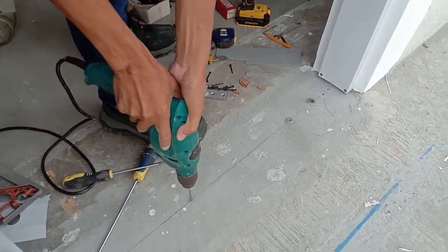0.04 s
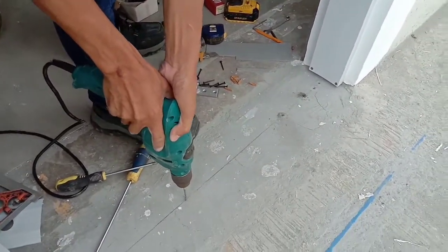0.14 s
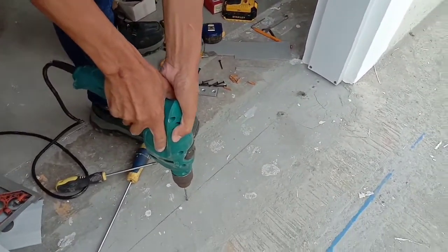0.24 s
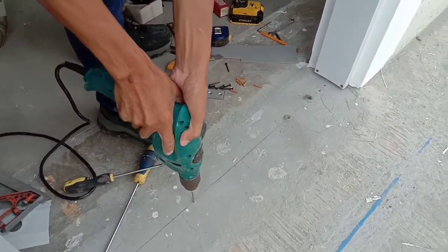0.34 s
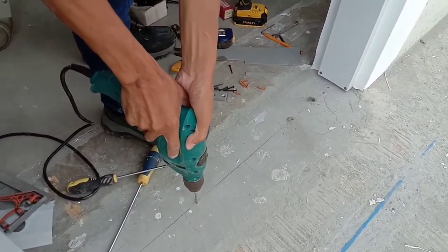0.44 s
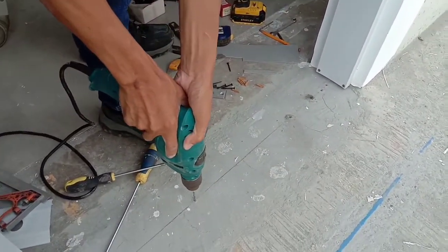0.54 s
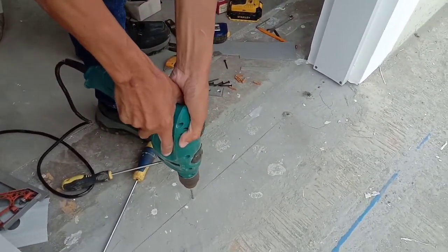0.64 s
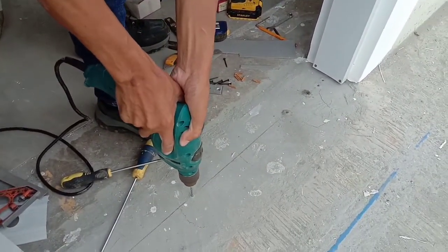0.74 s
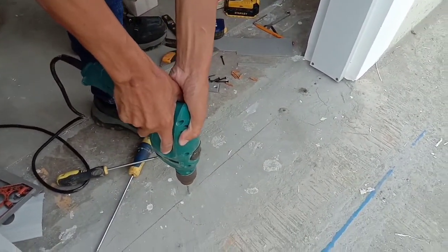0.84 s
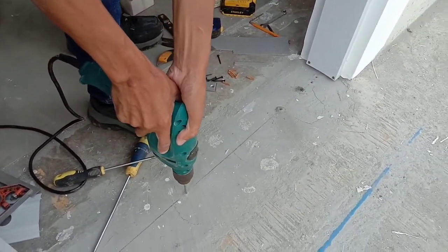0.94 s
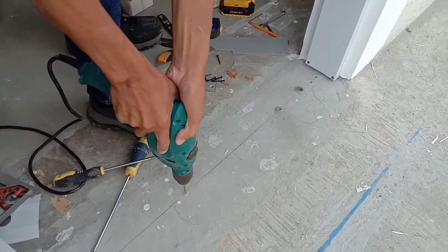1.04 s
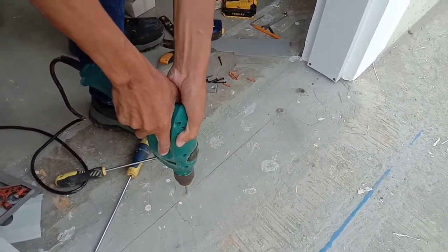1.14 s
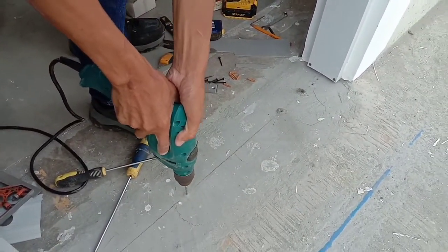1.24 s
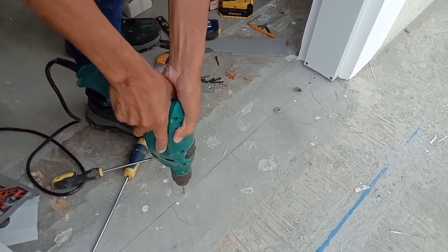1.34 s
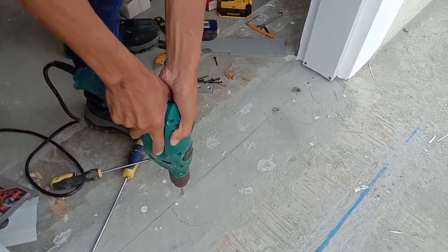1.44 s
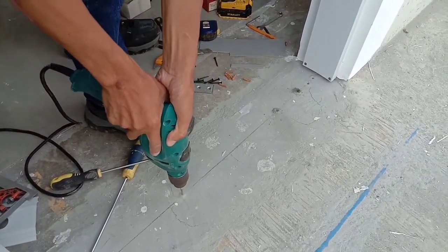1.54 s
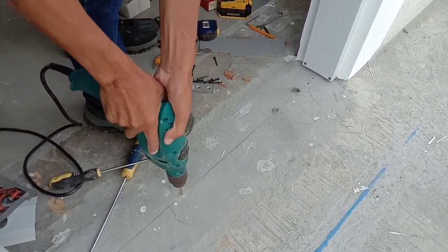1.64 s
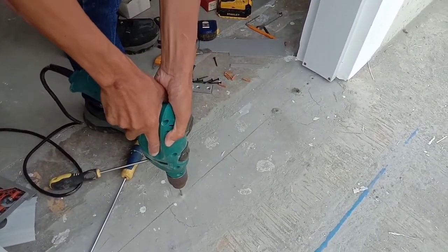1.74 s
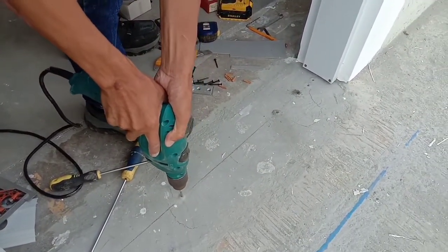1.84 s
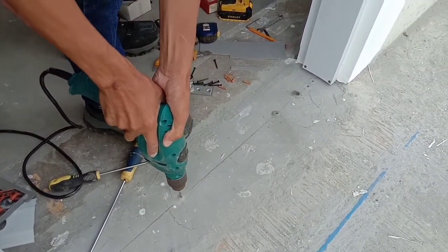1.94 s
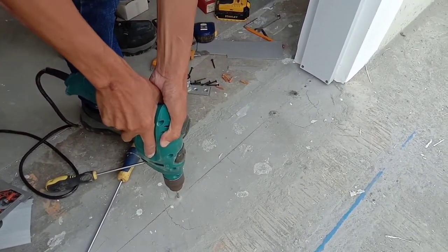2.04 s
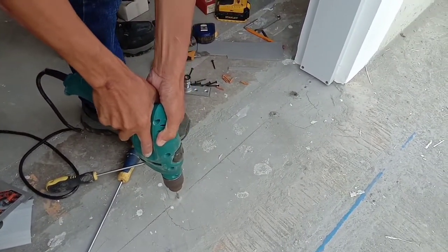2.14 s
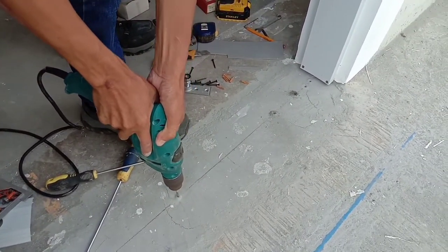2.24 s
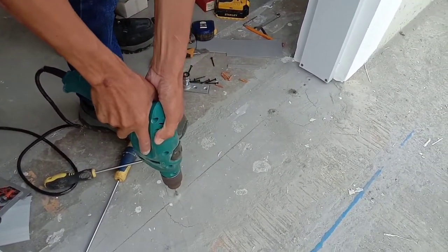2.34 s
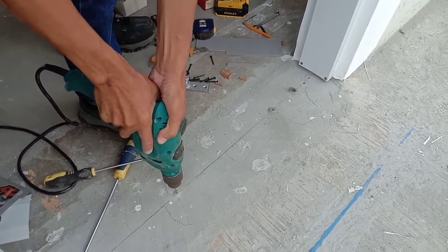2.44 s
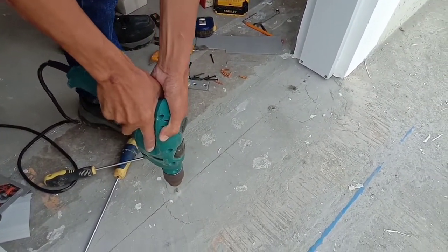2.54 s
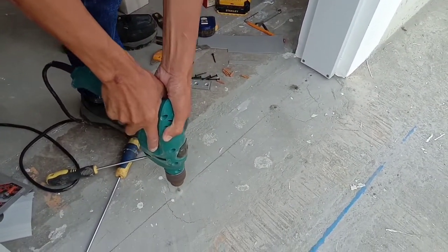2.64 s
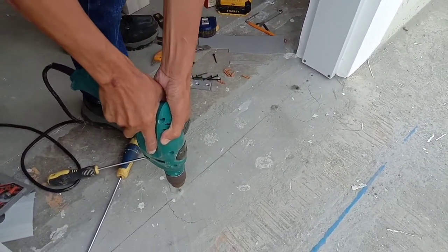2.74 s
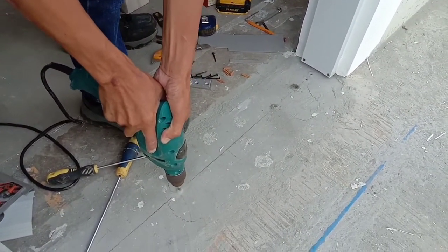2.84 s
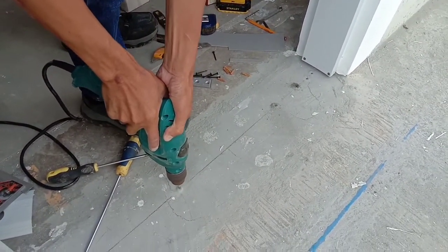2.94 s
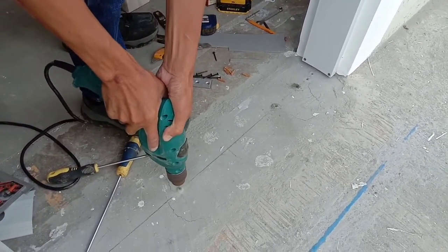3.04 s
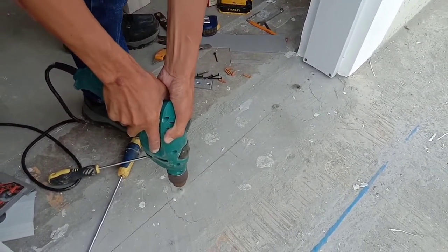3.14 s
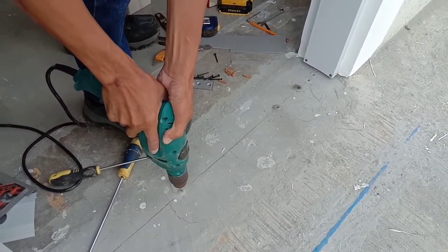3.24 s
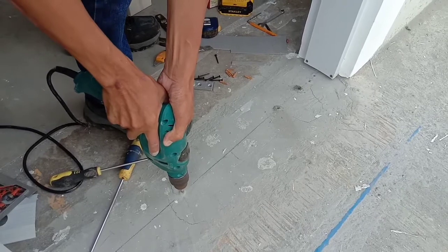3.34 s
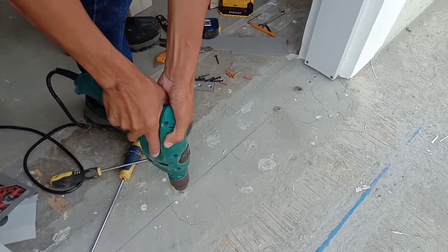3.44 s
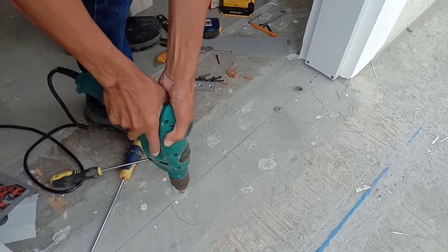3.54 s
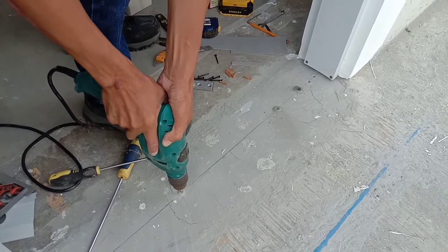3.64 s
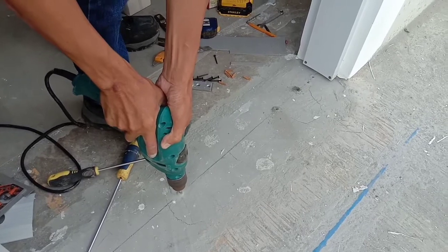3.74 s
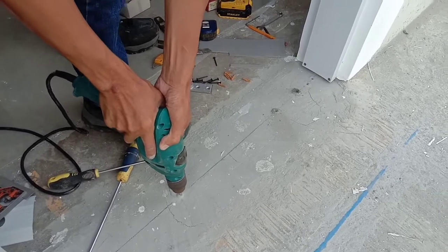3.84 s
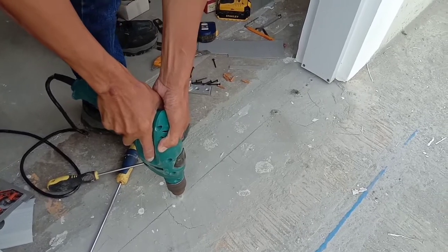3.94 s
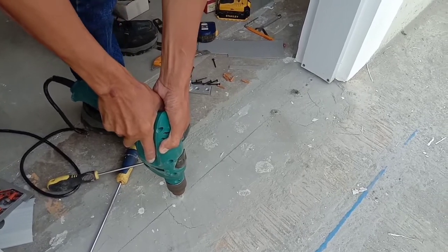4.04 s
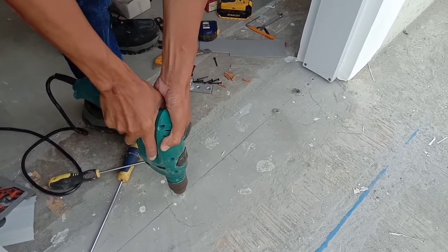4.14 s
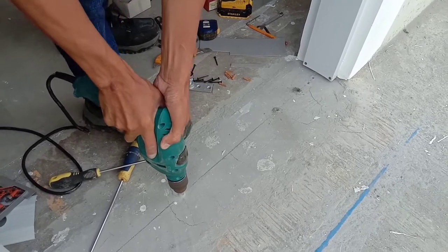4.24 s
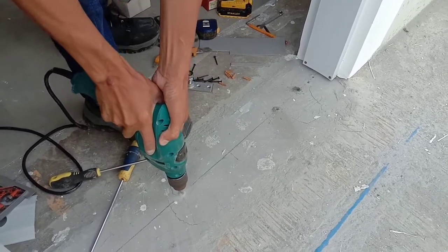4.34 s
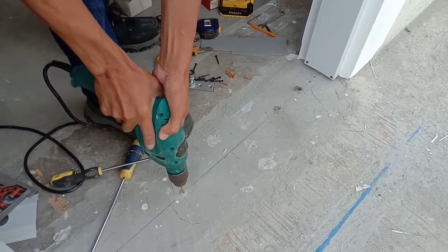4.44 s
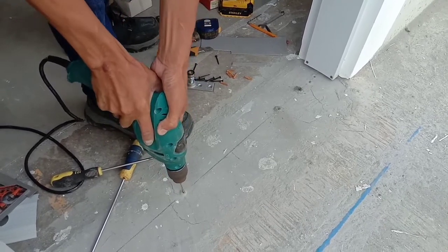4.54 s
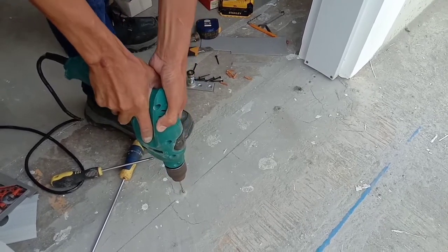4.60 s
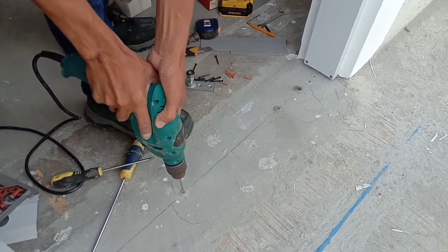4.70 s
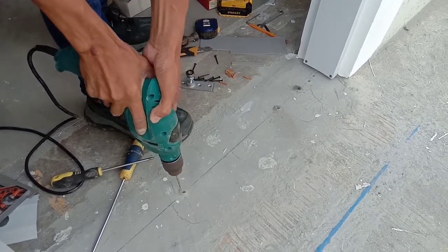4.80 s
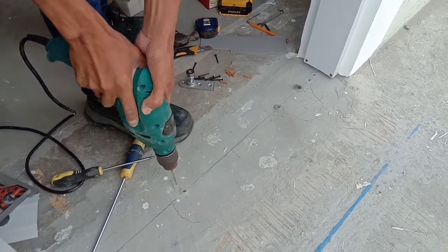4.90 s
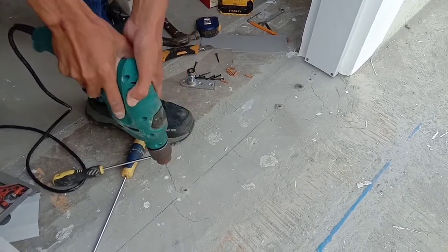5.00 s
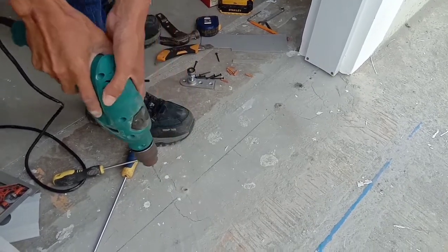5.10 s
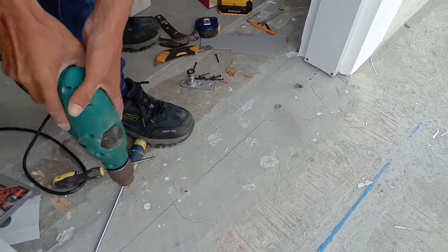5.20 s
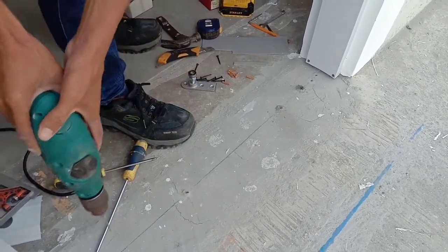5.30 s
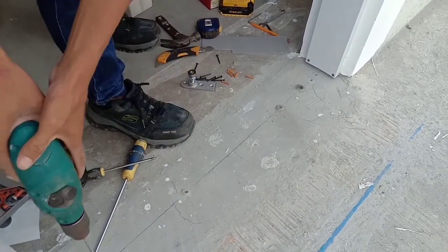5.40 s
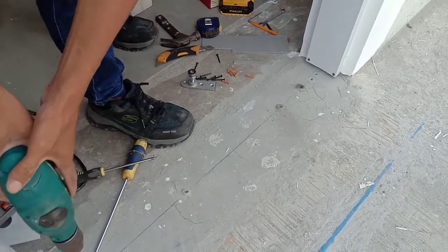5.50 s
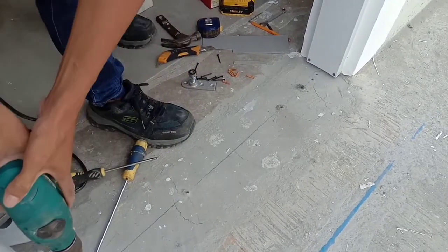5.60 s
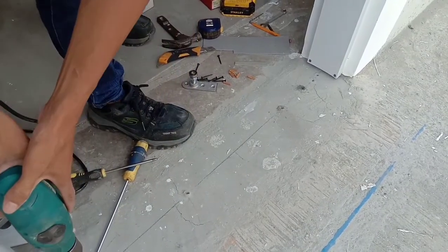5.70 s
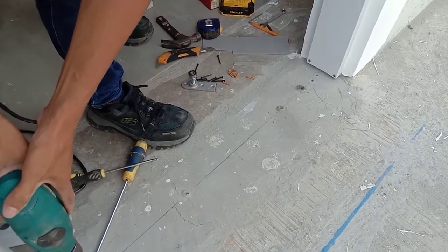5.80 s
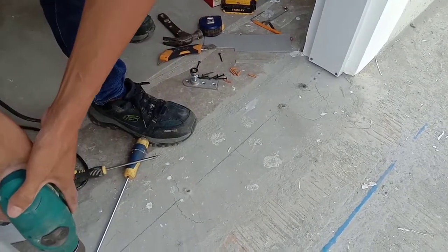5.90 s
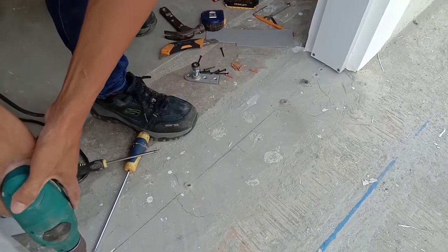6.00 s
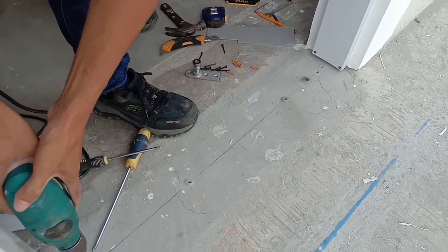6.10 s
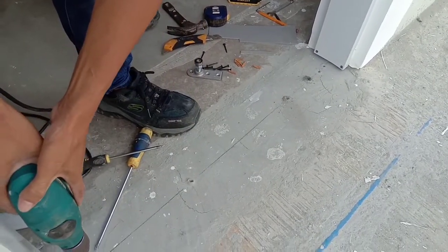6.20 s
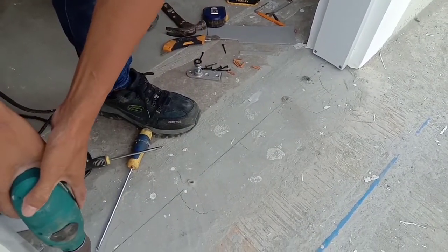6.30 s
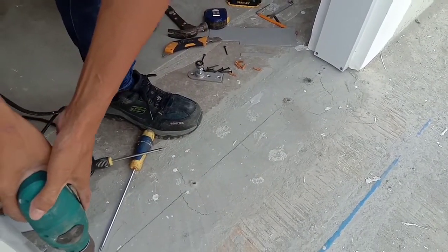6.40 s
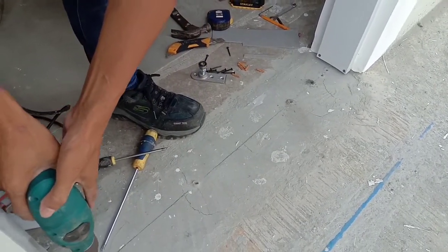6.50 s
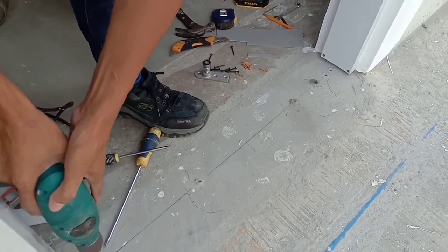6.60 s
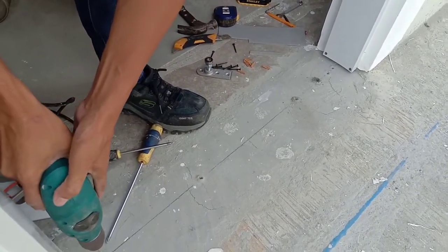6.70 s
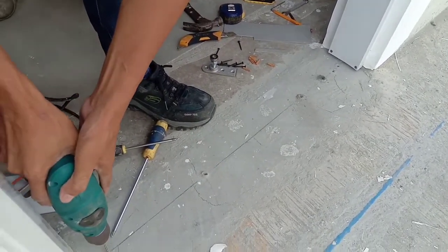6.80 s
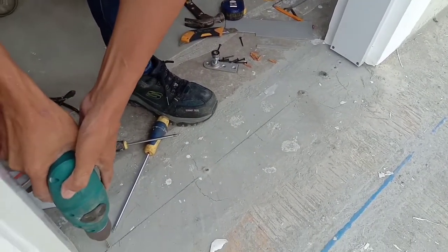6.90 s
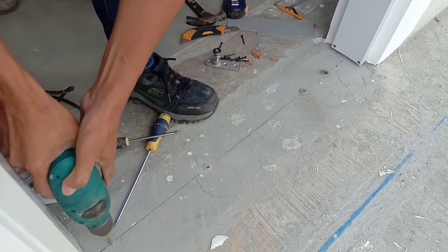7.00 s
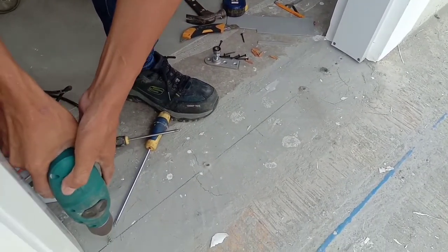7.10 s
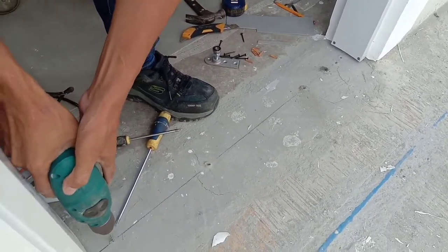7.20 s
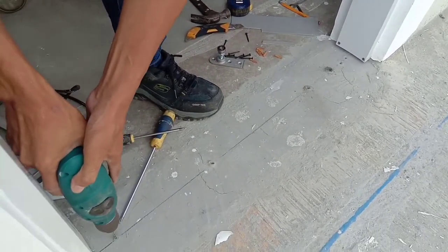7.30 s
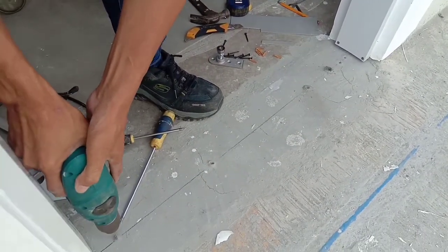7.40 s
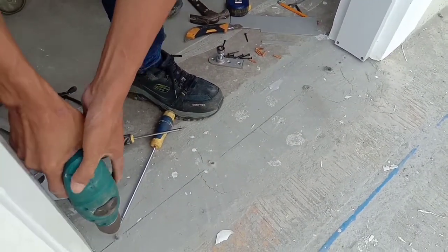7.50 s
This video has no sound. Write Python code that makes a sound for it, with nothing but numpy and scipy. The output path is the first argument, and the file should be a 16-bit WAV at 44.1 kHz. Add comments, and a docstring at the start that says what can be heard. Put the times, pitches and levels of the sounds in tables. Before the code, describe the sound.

A corded hammer drill revs up and grinds harshly into concrete, pulls out with clinks, whines down, then starts a second hole.

```python
"""A bare room: a corded hammer drill bores a concrete floor, close to the microphone.
Each ratchet tooth rings the bit and crushes grit; the blows also hum through drill and slab until the bit is out.
The motor then runs free and coasts down: fan rush, brush hiss and a falling commutator whine, with cooling air
buffeting the microphone; then a second hole is begun."""
import sys
import numpy as np
from scipy import signal
from scipy.fft import rfft, irfft, next_fast_len
from scipy.io import wavfile
from scipy.ndimage import uniform_filter1d

SR = 44100
rng = np.random.default_rng(int(sys.argv[2]) if len(sys.argv) > 2 else 0)


def unload_wav(signal):
    """Save mono or channel-first audio to the path in sys.argv[1] as 16-bit WAV at rate SR, clipped to [-1, 1]."""
    wavfile.write(
        sys.argv[1],
        SR,
        np.round(np.clip(np.atleast_2d(signal).T, -1, 1) * 32767).astype(np.int16),
    )


N = 332955
T = np.arange(N) / SR

TEETH, ROTOR_PER_TOOTH = 16, 10 / 16  # ratchet teeth per spindle turn; rotor turns per tooth
FULL_HZ = 620  # full speed; speeds are ratchet teeth per second
PULL_OUT_S, RELEASE_S, RESTART_S = 4.25, 5.0, 6.523  # bit out of hole 1, trigger released, hole 2 begun


def amp(db):
    """Decibels to gain."""
    return 10 ** (np.asarray(db) / 20)


def evened(x):
    """Scales to rms 1."""
    return x / np.sqrt(np.mean(x ** 2) + 1e-20)


def steady(x):
    """Holds the rms at 1 over about 0.09 s."""
    return x / np.sqrt(uniform_filter1d(x ** 2, size=4000) + 1e-12)


def curve(rows, axis=1):
    """One table column interpolated at every sample."""
    rows = np.array(rows)
    return np.interp(T, rows[:, 0], rows[:, axis])


def level(rows, axis=1):
    """A dB column as gain, silent outside its table."""
    inside = 1. * (T >= rows[0][0]) * (T <= rows[-1][0])
    return amp(curve(rows, axis)) * uniform_filter1d(inside, size=90)


def gate(start, end, edge_s):
    """1 between two times, with straight ramps centred on them."""
    return np.clip(.5 + np.minimum(T - start, end - T) / edge_s, 0, 1)


def read(points, hz):
    """A spectrum interpolated on a log-frequency axis."""
    f, value = np.transpose(points)
    return np.interp(np.log(hz + 1), np.log(f + 1), value)


def resonance_db(hz, rings):
    """Summed lift of resonances, rows of (f/Hz, width/Hz, lift/dB)."""
    return sum(lift / (1 + (2 * (hz - f) / width) ** 2) for f, width, lift in rings)


def colour(x, points, rings=()):
    """Minimum-phase filter of unit noise gain: broad spectrum plus resonances, falling below its first point."""
    hz = np.fft.rfftfreq(8192, 1 / SR)
    db = read(points, hz) + resonance_db(hz, rings)
    db = db - 10 * np.log10(1 + (points[0][0] / (hz + 5) / 2) ** 4)
    log_gain = np.log(amp(np.r_[db, db[-2:0:-1]]))
    min_phase = np.exp(np.conj(signal.hilbert(log_gain)))
    taps = np.fft.ifft(min_phase).real[:len(hz)]
    return signal.oaconvolve(x, taps / np.linalg.norm(taps))[:N]


def wander(hz):
    """Slow noise of rms 1, low-passed near hz."""
    coarse = np.arange(N // 16 + 2) * 16 / SR
    size = next_fast_len(len(coarse))
    lowpass = 1 / (1 + (np.fft.rfftfreq(size, coarse[1]) / hz) ** 4)
    slow = irfft(rfft(rng.standard_normal(size)) * lowpass, size)
    return evened(np.interp(T, coarse, slow[:len(coarse)]))


def tone(phase, rough):
    """A partial of rms 1 whose height and phase waver."""
    waver = 1 + rough * (wander(46) + 1j * wander(67))
    return evened((waver * np.exp(1j * phase)).real)


# reverberation: f/Hz, t60/s
ROOM_T60 = [(200, 0.39), (2000, 0.52), (6000, 0.37), (14000, 0.32)]


def room(x, wet_db):
    """Adds a tail of sparse reflections, each band dying at its own rate; scaled to keep the power."""
    taps = rng.choice([-1., 1.], SR // 2) * (rng.random(SR // 2) < 2000 / SR)  # 2000 reflections/s
    hz, t, z = signal.stft(taps, SR, nperseg=256)
    decay = amp(-60 * t / read(ROOM_T60, hz)[:, None])
    tail = signal.istft(z * decay, SR, nperseg=256)[1]
    wet = signal.fftconvolve(x, tail / np.linalg.norm(tail))[:N]
    return (x + amp(wet_db) * wet) / np.hypot(1, amp(wet_db))


# trigger squeezes, one a hole: steepest rise t/s, time constant/s
SQUEEZES = [(.075, .26), (6.945, .115)]
# speed the load allows in the first run: t/s, teeth f/Hz
LOADED_SPEED = [(.5, 695), (.85, 712), (1.15, 687), (1.65, 638.8), (1.85, 617.6), (2.4, 592.5),
                (2.63, 593.4), (2.76, 577.7), (2.98, 611.4), (3.4, 615.8), (3.89, 605.6), (4.09, 615),
                (4.3, 648.5), (4.87, 614.3)]
CREEP_HZ, RELEASE_HZ, SECOND_TOP_HZ = 108.87, 597, 652.4
FRICTION_HZ_PER_S, DRAG_EQUAL_HZ = 219, 586  # braking by friction; speed at which air drag equals it


def speed():
    """Teeth per second: S-curve up to what the load allows, coast down against friction and air drag."""
    first, second = (np.exp(-np.exp(np.minimum((s - T) / lag, 5))) for s, lag in SQUEEZES)
    first_top_hz = curve(LOADED_SPEED + [(RELEASE_S, RELEASE_HZ)])
    rise_hz = np.where(T < RESTART_S, first * (first_top_hz - CREEP_HZ), second * (SECOND_TOP_HZ - CREEP_HZ))
    coast_s = np.maximum(T - RELEASE_S, 0)
    angle = np.arctan(RELEASE_HZ / DRAG_EQUAL_HZ) - coast_s * FRICTION_HZ_PER_S / DRAG_EQUAL_HZ
    coasting = np.maximum(DRAG_EQUAL_HZ * np.tan(angle), 20)
    return np.where((T > RELEASE_S) & (T < RESTART_S), coasting, CREEP_HZ + rise_hz)


def with_speed(db_per_octave):
    """Gain of a sound that grows with speed; 1 at full speed."""
    return amp(db_per_octave * np.log2(speed() / FULL_HZ))


# gusts of cooling air: start t/s, length/s, level/dB
GUSTS = [(0, 0.44, -50.5), (.9, 1.26, -60), (2.045, .05, -49), (3.036, 0.25, -63), (3.63, .47, -64),
         (3.82, 0.057, -50.5), (4.37, .87, -61), (4.39, 0.044, -56), (4.54, 0.072, -44), (5.3, 1.01, -43),
         (5.512, .07, -42), (5.67, .07, -36.5), (5.937, .07, -41), (6.169, 0.075, -45), (6.3, 0.19, -50),
         (6.593, .37, -53), (6.922, .04, -53)]
# spectrum of the buffeting: f/Hz, level/dB per Hz
BUFFET_SPECTRUM = [(40, -23.5), (60, -11), (80, 0.5), (100, 0.5), (155, -2.5), (290, -14), (400, -20.5),
                   (550, -38), (900, -85)]
GUST_EDGE_S, DRAUGHT_DB = 0.037, -84


def buffet(lump_db=6.0, smooth_s=0.24):
    """Exhaust eddies thump the microphone over a faint draught; gusts shorter than smooth_s are less lumpy."""
    eddies = wander(23)
    power = amp(DRAUGHT_DB + lump_db * eddies) ** 2
    for s, length, db in GUSTS:
        lumps = evened(amp(lump_db * min(length / smooth_s, 1) * np.minimum(eddies, 1)))
        power = power + (amp(db) * lumps * gate(s, s + length, GUST_EDGE_S)) ** 2
    return np.sqrt(power) * colour(rng.standard_normal(N), BUFFET_SPECTRUM)


# rings of the bit on the wall of the hole: t/s, f/Hz, peak level/dB
CLINKS = [(4.268, 11400, -37), (4.292, 11400, -34), (4.316, 3900, -25.5), (4.319, 11100, -35),
          (4.341, 4000, -32), (4.385, 5700, -29), (4.412, 5170, -22.5), (4.425, 11100, -37),
          (4.548, 11550, -37), (4.555, 4010, -28)]


def clinks(decay_s=0.004):
    """The bit clinks on the wall on its way out: decaying sines of ringing steel."""
    out = np.zeros(N)
    for s, hz, db in CLINKS:
        age = np.maximum(T - s, 0)
        out += amp(db) * np.exp(-np.minimum(age / decay_s, 50)) * np.sin(2 * np.pi * hz * age)
    return out


# rattle of the chuck jaws: f/Hz, level/dB per Hz
CHUCK_SPECTRUM = [(1500, -8.5), (2300, -11), (3100, -4.5), (4000, -12), (5500, -4.5), (7500, -21),
                  (12000, -44)]


def chuck(teeth, db=-45, slack_hz=285, span_hz=70, ring_s=0.016, knocks_per_turn=1.37):
    """In a narrow range of low speed the loose chuck rattles: noise bursts, over one per spindle turn."""
    cycles = knocks_per_turn * teeth / TEETH
    age_s = (cycles % 1) / (np.gradient(cycles) * SR)
    loose = np.exp(-((speed() - slack_hz) / span_hz) ** 2)
    rattle = steady(np.exp(-age_s / ring_s) * rng.standard_normal(N))
    return amp(db) * loose * colour(rattle, CHUCK_SPECTRUM)


# commutator partials: multiple of rotor speed, level/dB
WHINE_PARTIALS = [(12, -15), (22, -10), (24, 0), (30, -14), (36, -19), (48, -13), (72, -13)]
# how the housing passes the whine: f/Hz, level/dB
HOUSING = [(2100, -9), (3000, -6.5), (4400, -14), (4950, -1.5), (5600, -6), (6650, -2.5), (7400, -7),
           (7800, -29), (9400, -27), (13000, -38)]
# narrow overtone swelling as it falls with the whine: t/s, f/Hz, level/dB
FALLING_OVERTONE = [(5.9, 5900, -64), (6.05, 5912, -65), (6.22, 5795, -49), (6.36, 5420, -50),
                    (6.42, 5350, -66)]
WHINE_DB, WHINE_DB_PER_OCTAVE = -35, 4


def whine(teeth, rough=0.35, throb=0.26):
    """Commutator bars pass the brushes and sweep the housing's resonances; a falling overtone swells briefly."""
    rotor = 2 * np.pi * ROTOR_PER_TOOTH * teeth
    rotor_hz = ROTOR_PER_TOOTH * speed()
    bars = sum(amp(db + read(HOUSING, k * rotor_hz)) * tone(k * rotor, rough) for k, db in WHINE_PARTIALS)
    bars *= amp(WHINE_DB) * with_speed(WHINE_DB_PER_OCTAVE) * (1 + throb * np.cos(rotor))
    overtone_phase = 2 * np.pi * np.cumsum(curve(FALLING_OVERTONE)) / SR
    overtone = evened(((wander(160) + 1j * wander(160.5)) * np.exp(1j * overtone_phase)).real)
    return gate(PULL_OUT_S, RESTART_S, edge_s=0.044) * bars + level(FALLING_OVERTONE, axis=2) * overtone


# fan rush at full speed, before the vents: f/Hz, level/dB per Hz
FAN = [(250, -30.5), (400, -15.5), (520, -14), (750, -5.5), (1000, -5.5), (1300, -4), (1800, -6.5),
       (2500, -8), (4000, -11.5)]
# air resonances of the housing: f/Hz, width/Hz, lift/dB
VENTS = [(558, 78, 12), (780, 130, 2), (1026, 150, 8), (1250, 110, 7)]
# fan blades, gears, brushes: multiple of rotor speed, level/dB before the fan gain
ROTOR_TONES = [(2, -20), (4, -19), (5, -18.5), (6, -25), (7, -17), (8, -17.5), (9, -19.5), (11, -22),
               (14, -16.5), (17, -17), (19, -20), (23, -28), (25, -28), (28, -36)]
# brush hiss: f/Hz, level/dB per Hz
BRUSHES = [(1500, -24), (2500, -8.5), (4000, -6.5), (4900, -4.5), (5800, 4), (6500, -2.5), (7300, -7),
           (8200, -17), (11000, -16.5), (13000, -27.5), (15400, -25)]
FAN_DB, FAN_KNEE_HZ, FAN_STEEPNESS = -36, 411, 4.5  # the fan dies away below the knee speed
BRUSH_DB, BRUSH_DB_PER_OCTAVE = -35.5, 7.5


def motor(teeth, quiet_db=-10, shift=0.67, chatter=0.065, rise_s=0.027):
    """Fan rush and rotor tones sink as the rotor slows; brushes hiss. Quieter outside PULL_OUT_S to RESTART_S."""
    rate = speed()
    risen = np.clip((T - PULL_OUT_S) / rise_s, 0, 1) * (T < RESTART_S)
    frame_s, bin_hz = np.arange(N // 128 + 5) * 128 / SR, np.fft.rfftfreq(512, 1 / SR)
    pace = np.interp(frame_s, T, rate)[:, None] / FULL_HZ
    z = rng.standard_normal((len(frame_s), len(bin_hz), 2)) @ [1, 1j]
    z *= amp(read(FAN, bin_hz / pace ** shift) + resonance_db(bin_hz, VENTS)) / (1 + (bin_hz / 3500) ** 4)
    rush = steady(signal.istft(z.T, nperseg=512, noverlap=384)[1][:N])
    rotor = 2 * np.pi * ROTOR_PER_TOOTH * teeth
    tones = sum(amp(db) * tone(k * rotor, rough=1.0) for k, db in ROTOR_TONES)
    fan_gain = amp(FAN_DB) / np.sqrt(1 + (FAN_KNEE_HZ / rate) ** FAN_STEEPNESS)
    fan = fan_gain * (amp(-2.5) * rush + tones)

    chattering = 1 + chatter * np.cos(2 * np.pi * teeth / TEETH)
    scrape = rng.standard_normal(N) * chattering * amp(0.9 * wander(120))
    hiss = colour(evened(scrape), BRUSHES)
    # slow brushes lose their top octave
    brisk = np.clip(rate / FULL_HZ, 0, 1) ** 0.46
    dull = signal.filtfilt(*signal.butter(2, 7500, fs=SR), hiss)
    hiss = brisk * hiss + (1 - brisk) * dull
    brush_gain = amp(BRUSH_DB) * with_speed(BRUSH_DB_PER_OCTAVE)
    return amp(quiet_db * (1 - risen)) * (fan + brush_gain * hiss)


# flutes rubbing the wall of hole 1: t/s, level/dB
RUBBING = [(1, -54), (1.6, -38.5), (2.2, -34.5), (2.45, -34.5), (2.9, -37.5), (3.4, -32), (3.7, -36.5),
           (4.1, -37.5), (4.2, -35.5)]
# modes of the bit: f/Hz (the upper ones at full speed), width/Hz, level/dB before evening
BIT_MODES = [(1993, 126, -4.5), (5664, 240, 1), (9640, 350, -15.5)]


def singing(teeth, throb=0.64, drift=.7):
    """The bit's modes ring as its bent tip swings against the wall; the upper ones sag with the speed."""
    sagged_s = np.cumsum((speed() / FULL_HZ) ** drift) / SR
    spindle = 2 * np.pi * teeth / TEETH
    swing = 1 + throb * np.cos(spindle) + 0.36 * np.cos(3 * spindle)
    rings = np.zeros(N)
    for k, (hz, width, db) in enumerate(BIT_MODES):
        waver = wander(width / 2) + 1j * wander(width / 2)
        carrier = np.exp(2j * np.pi * hz * (sagged_s if k else T))
        rings += amp(db) * evened((waver * carrier).real)
    return level(RUBBING) * evened(swing * rings)


# hum at the blow rate, one table a hole, before the partials' levels: t/s, level/dB
HUM_LEVEL = [
    [(0, -63), (.3, -60), (.5, -53), (1, -41.5), (1.75, -37.5), (2.1, -39), (3.4, -37), (4.14, -38.5),
     (4.27, -64)],
    [(6.8, -65), (7.02, -58.5), (7.28, -52.5), (7.42, -43), (7.55, -45)],
]
# partials: hole 1 level/dB, hole 2 level/dB, throb/0-1, roughness/0-1
HUM_PARTIALS = [(0, 1.5, 0.06, 0.07), (-12.5, 4, 0.39, 0.19), (-2, 0.5, 0.36, 0.14)]
# bit resonance lifting a partial that passes it in hole 1: f/Hz, width/Hz, lift/dB
HUM_RING = (1800, 115, 4.9)
# brief swells of the overtones: t/s, half length/s, lift/dB
SWELLS = [(.78, 0.052, 6), (1.213, 0.036, 10.5), (1.645, 0.096, 6.5), (4.037, 0.049, 5), (7.2, 0.15, 6)]


def hum(teeth, fade_db=1.56):
    """The blows shake drill and slab at their rate; the bit's wobble throbs the partials with the spindle."""
    out, rate = np.zeros(N), speed()
    swell_db = sum(db * np.exp(-((T - s) / half) ** 2) for s, half, db in SWELLS)
    for k, (first_db, second_db, wobble, rough) in enumerate(HUM_PARTIALS, 1):
        throb = sum(np.cos(2 * np.pi * (m * teeth / TEETH + rng.random())) / np.sqrt(m) for m in range(1, 5))
        swing = 1 + wobble * throb + rough * (wander(63) + 1j * wander(60))
        partial = evened((swing * np.exp(2j * np.pi * k * teeth)).real)
        first = level(HUM_LEVEL[0]) * amp(first_db + resonance_db(k * rate, [HUM_RING]))
        second = level(HUM_LEVEL[1]) * amp(second_db)
        overtone_db = (k > 1) * (swell_db + fade_db * wander(5.3))
        out += (first + second) * amp(overtone_db) * partial
    return out


# bit, chuck and slab with the bit standing out, sunk, and in hole 2: f/Hz, level/dB per Hz
BIT_OUT = [(300, -36), (600, -16.5), (1000, -24), (1550, -12.5), (2000, -4.5), (2600, -9), (3000, -4),
           (4400, -7), (5400, -2.5), (7100, -7.5), (7900, -16), (10000, -17.5), (13000, -28.5),
           (15400, -29)]
BIT_SUNK = [(300, -33), (750, -25), (1000, -19.5), (1600, -9.5), (1980, -3), (2200, -5), (3100, -2.5),
            (3400, -5.5), (4800, -2), (5700, 0.5), (7100, -3), (7900, -15), (10500, -17.5), (13000, -23.5),
            (15400, -31)]
BIT_FRESH = [(300, -28), (720, -12.5), (1000, -4.5), (1450, -6.5), (1900, -1), (2500, -3.5), (3100, -0.5),
             (4300, -2), (5800, -1.5), (7100, -5), (7900, -13.5), (9800, -14.5), (13000, -26.5),
             (15400, -28)]
# ringing of the bit in the same states: f/Hz, width/Hz, lift/dB
RINGS_OUT = [(2170, 410, 6), (3140, 250, 2.5), (4200, 270, 1), (5550, 550, 3), (6900, 530, 5.5),
             (8300, 950, -5)]
RINGS_SUNK = [(2250, 59, 3.7), (3000, 160, 4.5), (3690, 250, 3.7), (4280, 100, 2.6), (4977, 1000, 1.8),
              (6240, 92, 1.7), (15340, 200, 8)]
RINGS_FRESH = [(1111.3, 300, 4), (1820, 180, 4.5), (3020, 250, 5.5), (4754, 250, 1.5), (5773, 300, 4.5),
               (6800, 700, 5), (8200, 900, -4.5)]
# push on hole 1, as hammering at full speed: t/s, level/dB
PUSH = [(0, -30.5), (.66, -30.5), (1, -28.5), (1.96, -26.5), (2.76, -28), (3.37, -26), (4.06, -27.1),
        (4.19, -31.5), (4.26, -39)]
SECOND_PUSH_DB, BITE_DB, BITE_S = -28.9, 2, 0.027  # even push on hole 2 after a harder first bite
BLOW_DB_PER_OCTAVE = 2.5


def hammer(teeth, tooth_db=0.66, chance_db=1., wobble_db=0.83, lurch_db=-0.03, slip_s=.000022,
           spread_s=.0012, crush_s=0.0044, rattle=.2, shallow_db=-9, deep_db=-4.5):
    """Each ratchet tooth strikes the bit: a sharp blow that rings it, and a burst of crushed grit."""
    blow, rate = np.floor(teeth).astype(int), speed()
    size, early = rng.standard_normal((N, 2)).T
    depth = np.clip((T - .9) / 1.47, 0, 1) * (T < RESTART_S)

    # unequal teeth and a wobbling bit: this part repeats each spindle turn
    tooth_force_db = tooth_db * evened(rng.standard_normal(TEETH))[blow % TEETH]
    wobble_force_db = wobble_db * np.cos(2 * np.pi * teeth / TEETH) * (T < RESTART_S)
    force = amp(tooth_force_db + wobble_force_db + chance_db * size[blow] + lurch_db * wander(25))

    # early or late slips blur the highest overtones
    slip = slip_s * early[np.round(teeth).astype(int)]
    offset = (((teeth + .5) % 1 - .5) / rate + slip) * SR  # in samples
    strikes = np.sinc(offset) * np.exp(-(offset / 6) ** 2)
    # bending waves disperse each blow, treble first; spread_s is the delay at 6 kHz
    hz = np.fft.rfftfreq(N, 1 / SR)
    strikes = irfft(rfft(strikes) * np.exp(-4j * np.pi * spread_s * np.sqrt(hz * 6000)), N)
    grit = (rattle + np.exp(-(teeth % 1) / rate / crush_s)) * rng.standard_normal(N)

    # the hole guides the bit: blows stand out more from the grit as it sinks
    strike_gain = amp(shallow_db + depth * (deep_db - shallow_db))
    drive = steady(force * (strike_gain * steady(strikes) + steady(grit)))
    first = (1 - depth) * colour(drive, BIT_OUT, RINGS_OUT) + depth * colour(drive, BIT_SUNK, RINGS_SUNK)
    second = colour(drive, BIT_FRESH, RINGS_FRESH)
    bite_db = BITE_DB * np.exp(-abs(T - RESTART_S) / BITE_S)
    second_push = gate(RESTART_S, np.inf, edge_s=0.0029) * amp(SECOND_PUSH_DB + bite_db)
    return with_speed(BLOW_DB_PER_OCTAVE) * (level(PUSH) * first + second_push * second)


def scene():
    """One wavering shaft, counted in teeth passed, drives hammer and motor; the air buffets without room."""
    teeth = np.cumsum(speed() * (1 + .0018 * wander(18.1))) / SR
    drill = room(clinks() + chuck(teeth) + motor(teeth) + singing(teeth) + hammer(teeth), wet_db=-11.0)
    tones = room(whine(teeth), wet_db=-8) + room(hum(teeth), wet_db=-12)
    return np.tile(buffet() + tones + drill, (2, 1))


EDGE_HZ = 15520


def record(dry, ceiling=0.19):
    """A mono microphone rounds off the peaks; then a steep low-pass at EDGE_HZ."""
    rounded = dry / (1 + (dry / ceiling) ** 4) ** (1 / 4)
    lowpass = signal.firwin(1023, EDGE_HZ, window=("kaiser", 9), fs=SR)
    return signal.oaconvolve(rounded, lowpass[None], "same")


dry = scene()
out = record(dry)
unload_wav(out)
```